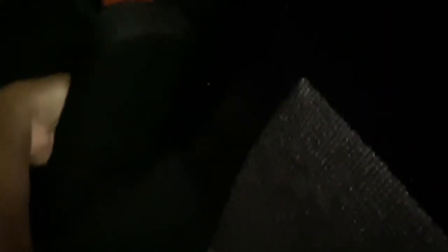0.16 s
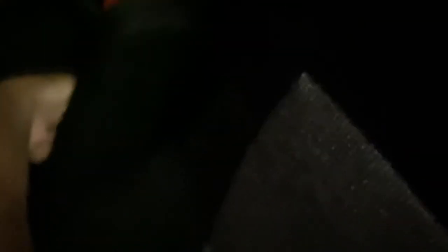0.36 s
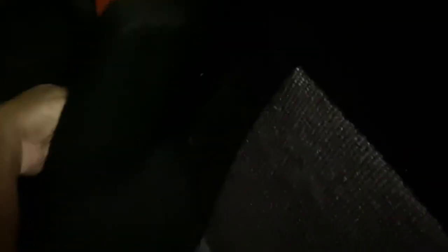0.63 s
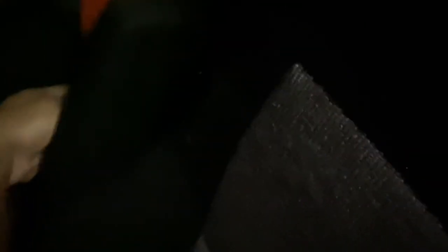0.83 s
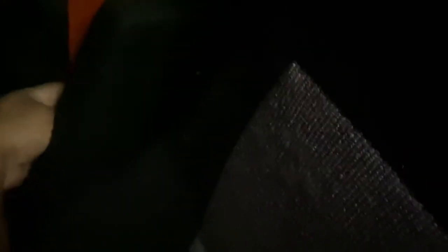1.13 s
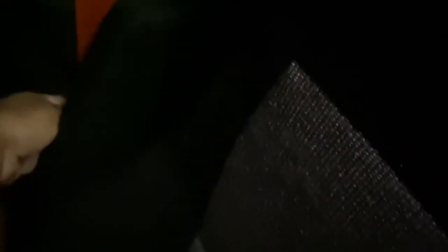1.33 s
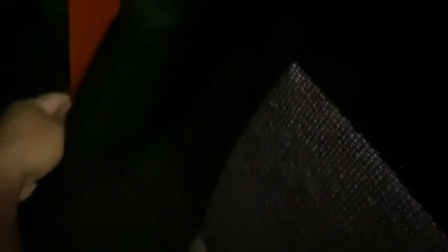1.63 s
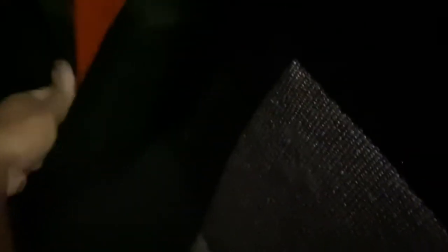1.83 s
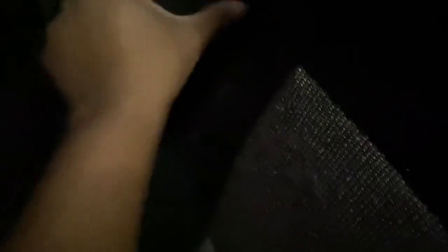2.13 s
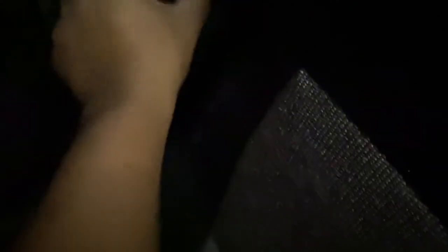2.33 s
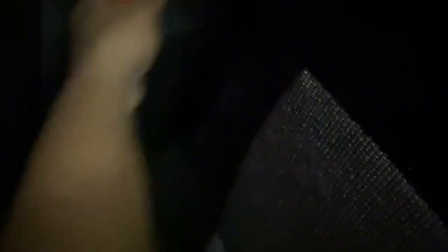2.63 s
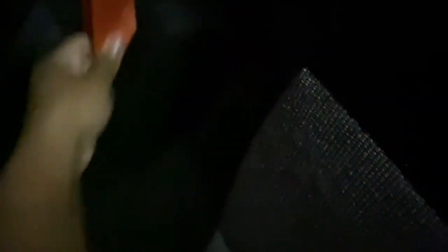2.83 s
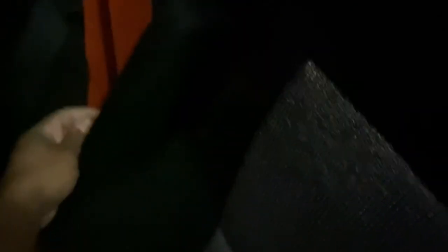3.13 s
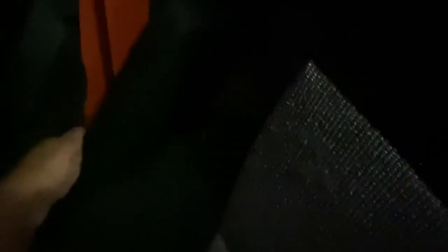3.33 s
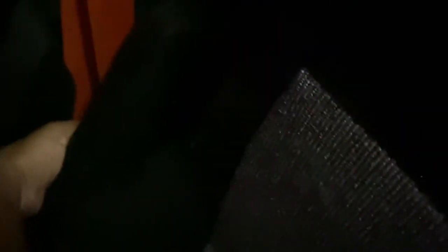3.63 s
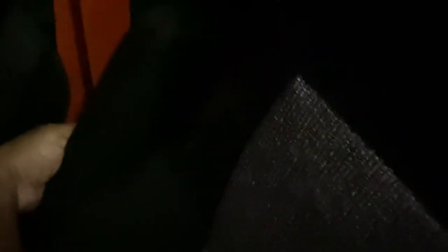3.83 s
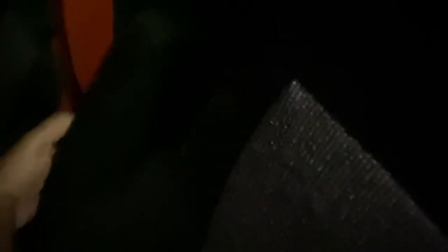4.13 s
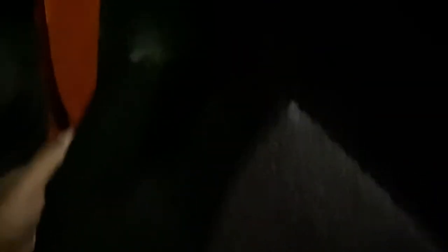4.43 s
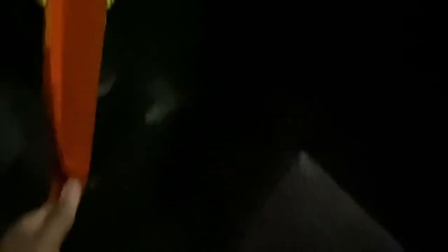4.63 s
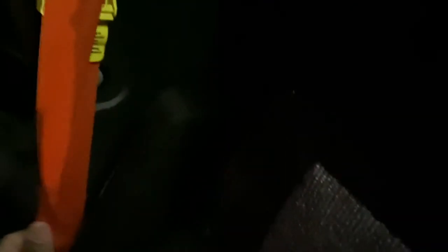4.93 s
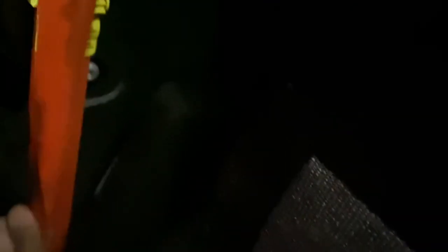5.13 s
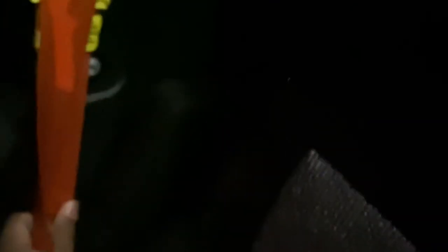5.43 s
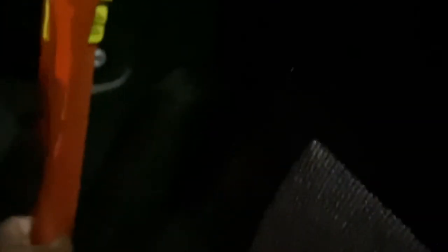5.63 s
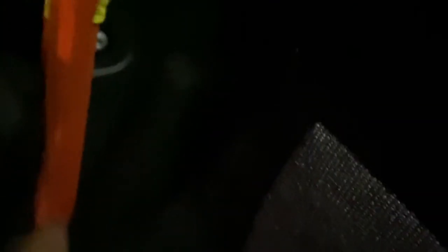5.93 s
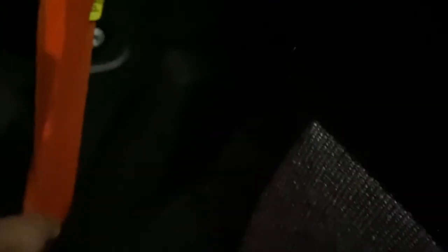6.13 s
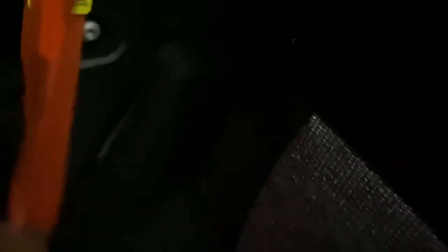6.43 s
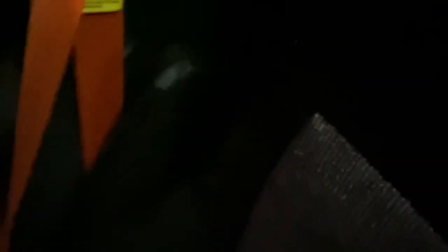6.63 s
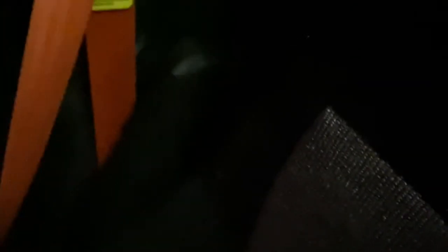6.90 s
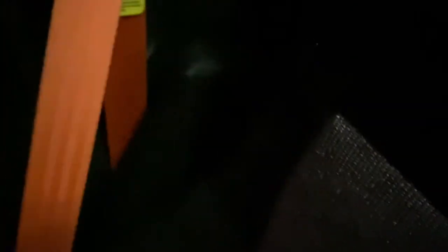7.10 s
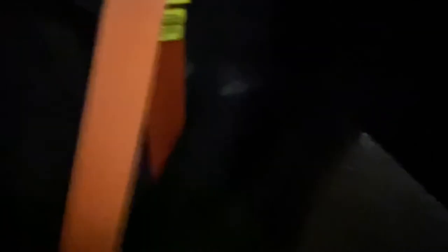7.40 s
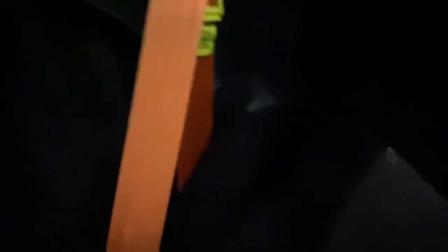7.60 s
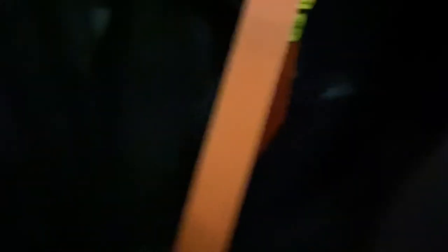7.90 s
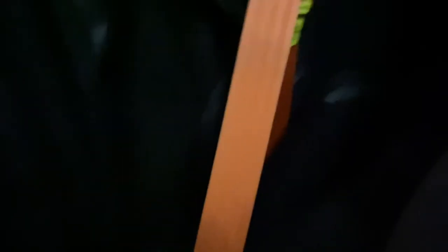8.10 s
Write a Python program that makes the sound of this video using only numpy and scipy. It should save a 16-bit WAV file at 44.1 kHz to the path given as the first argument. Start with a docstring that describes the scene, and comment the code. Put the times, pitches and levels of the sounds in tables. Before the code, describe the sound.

Inside an idling truck cab, a belt strap slides and scuffs, knocks dully on the door panel, then snaps sharply into its buckle.

```python
"""A seat belt is pulled out, wound round the door handle and latched inside an idling truck's cab.
Its webbing hisses and rasps by stick-slip friction; dragged hard, it judders on the door panel.
Buckle clicks and knocks on the door trim are short contacts that excite decaying modes.
Sines over coloured noise make the engine hum; one wandering sine makes a faint whine.
The two microphone ports are close, to the right of the belt; delays and cab scattering set them apart."""
import sys
import numpy as np
from scipy import signal
from scipy.io import wavfile
from scipy.ndimage import uniform_filter1d

SR = 44100
rng = np.random.default_rng(int(sys.argv[2]) if len(sys.argv) > 2 else 0)


def master_out(mix):
    """Clip the mix to full scale and print it as 16-bit PCM to the path in sys.argv[1]."""
    frames = np.transpose(np.atleast_2d(mix))
    ceiling = np.clip(frames, -1, 1)
    pcm = np.round(ceiling * 32767).astype(np.int16)
    wavfile.write(sys.argv[1], SR, pcm)


N = 364026  # length in samples
PORT_DELAY_MS, KNOCK_DELAY_MS = 0.46, 0.26  # lag of the right port: usual, and for sounds of the door


def amp(db):
    """Level: decibels to an amplitude ratio."""
    return 10 ** (np.asarray(db) / 20)


def evened(x):
    """Mean power: scales to rms 1."""
    return x / np.sqrt(np.mean(x ** 2) + 1e-20)


def peaked(x):
    """Short-time power: scales a stereo hit so that its loudest 5 ms have rms 1 in the port average."""
    power = uniform_filter1d(x.mean(0) ** 2, size=220)
    return x / np.sqrt(power.max() + 1e-20)


def in_band(x, band):
    """Band level: scales a stereo sound so that the port average has rms 1 within a band in Hz."""
    bandpass = signal.butter(4, band, "bandpass", fs=SR, output="sos")
    return x / signal.sosfilt(bandpass, x.mean(0)).std()


def read(points, hz):
    """Logarithmic frequency: interpolates a spectrum on a log-frequency axis."""
    f, value = np.transpose(points)
    return np.interp(np.log(hz + 1), np.log(f + 1), value)


def curves(rows):
    """Linear interpolation: each column of a table of times, sample by sample."""
    times, *columns = np.transpose(rows)
    return [np.interp(np.arange(N) / SR, times, column) for column in columns]


def add(mix, start_s, sound):
    """Superposition: mixes a stereo sound in at a given time."""
    part = mix[:, max(round(start_s * SR), 0):][:, :sound.shape[1]]
    part += sound[:, :part.shape[1]]


def colour(x, points, size=2048):
    """Minimum phase: a causal filter whose phase follows from the given spectrum."""
    log_gain = np.log(amp(read(points, abs(np.fft.fftfreq(size, 1 / SR)))))
    taps = np.fft.ifft(np.exp(np.conj(signal.hilbert(log_gain)))).real
    return signal.oaconvolve(x, taps)[:len(x)]


def drift(per_s):
    """Random fluctuation: lines between random knots, per_s of them a second, rms about 1."""
    place = np.arange(N) * per_s / SR
    knots = rng.standard_normal(N // 16)
    return np.interp(place, np.arange(len(knots)), knots) * np.sqrt(3 / 2)


def resonate(x, hz, width_hz):
    """Simple resonance: one damped pole with gain about 1 at hz."""
    radius = np.exp(-np.pi * width_hz / SR)
    pole = radius * np.exp(2j * np.pi * hz / SR)
    return 2 * signal.lfilter([1 - radius], [1, -pole], x).real


def ring(modes, t):
    """Modal decay: struck modes die away exponentially, by 60 dB in t60."""
    return sum(amp(db) * np.sin(2 * np.pi * hz * t) * np.exp(-np.log(1000) * t / t60)
               for hz, db, t60 in modes)


def flex(modes, t):
    """Modal build-up: panel modes take a little over a cycle to grow, so the high ones speak first."""
    return sum(ring([mode], t) * (1 - np.exp(-(t * mode[0] / 1.27) ** 2)) for mode in modes)


def burst(t, rise, decay):
    """Contact noise: a swarm of tiny contacts swells and dies (time constants in s)."""
    return rng.standard_normal(len(t)) * (1 - np.exp(-(t / rise) ** 2)) * np.exp(-t / decay)


# Decay of the scattered sound in the padded cab: f/Hz, t60/s
CAB_DECAY = [(100, 0.16), (400, 0.13), (1500, 0.059), (6000, 0.041), (15000, 0.01)]


def cab(x, wet_db, delay_ms=PORT_DELAY_MS, size=4096):
    """Direct and scattered sound: the right port hears the source late; the cab then scatters it briefly."""
    hz, t, z = signal.stft(rng.standard_normal((2, size)), SR, nperseg=128)
    decay = amp(-60 * t / read(CAB_DECAY, hz)[:, None])
    tail = signal.istft(z * decay, SR, nperseg=128)[1][:, :size]
    tail *= np.arange(size) > SR / 1000  # scattering starts after 1 ms
    paths = amp(wet_db) * tail / np.linalg.norm(tail[0])
    paths[0, 0] += 1
    paths[1, round(delay_ms * SR / 1000)] += 1
    return signal.fftconvolve(x[None], paths, axes=1)[:, :len(x)]


def slips(grain_db, flutter_db, patch_db, alike, delay_ms=PORT_DELAY_MS):
    """Stick-slip: threads slip in tiny clumps, folds vary the colour, and the ports hear partly the same."""
    clumps = amp(grain_db * drift(1400) + flutter_db * drift(90))
    left, other = rng.standard_normal((2, N)) * clumps
    right = alike * left + np.sqrt(1 - alike ** 2) * other
    right = np.roll(right, round(delay_ms * SR / 1000))
    z = signal.stft(np.array([left, right], np.float32), nperseg=512)[2]
    patches = uniform_filter1d(rng.standard_normal(z.shape[1:]), size=6, axis=0)  # over frequency
    patches = evened(uniform_filter1d(patches, size=10, axis=1))  # over time
    return signal.istft(z * amp(patch_db * patches), nperseg=512)[1][:, :N]


def snags(per_s, spread_db):
    """Random impulses: single threads let go at chance moments; a few snap much harder than the rest."""
    size = amp(spread_db * np.minimum(rng.exponential(size=N), 4))
    return size * rng.choice([-1, 1], N) * (rng.random(N) < per_s / SR)


def friction(x, spectrum, band):
    """Source and filter: slips are coloured by the cloth and scaled to rms 1 in their band."""
    return in_band(np.array([colour(port, spectrum) for port in x]), band)


END_DB = -11  # level half a length from the peak of a movement of skew 1


def strokes(rows, shape, skew):
    """Amplitude envelope: each movement (t/s of the peak, length/s, level/dB) is one bell; powers add."""
    t, power = np.arange(0, N, 32) / SR, 0
    for peak, length, db in rows:
        # a larger shape flattens the top; a skew above 1 swells faster than it fades
        away = (t - peak) / (length / 2) * np.where(t < peak, -skew, 1 / skew)
        power = power + amp(db + END_DB * np.minimum(abs(away), 10) ** shape) ** 2
    return np.interp(np.arange(N) / SR, t, np.sqrt(power))


# Engine hum in the cab: f/Hz, level/dB (rms)
HUM_ORDERS = [(44.9, -45.5), (48.4, -48.5), (52.4, -73), (57.4, -50.5), (69.9, -36), (90, -45), (96.6, -74)]
# Spectrum of cab rumble and air: f/Hz, relative level/dB (per Hz)
RUMBLE_SPECTRUM = [(22, -74.5), (32, -56), (43, -13.5), (60, 6), (110, 1), (160, -5), (250, -9.5),
                   (350, -16.5), (500, -24.5), (800, -42.5), (2000, -49), (5000, -64), (15000, -73)]
# Level of the rumble above its deepest part: t/s, level/dB
RUMBLE_LEVEL = [(0, -46.5), (2.2, -47), (3.1, -45), (4.5, -45), (5.0, -50), (6.9, -49), (7.7, -53),
                (8.25, -51.5)]


def engine():
    """Beats and a diffuse field: steady low orders beat over rumble shared less as the waves shorten."""
    t = np.arange(N) / SR
    hum = sum(amp(db) * np.sqrt(2) * np.sin(2 * np.pi * (hz * t + rng.random()) + 0.035 * drift(0.81))
              for hz, db in HUM_ORDERS)
    shared, apart = (colour(rng.standard_normal(N), RUMBLE_SPECTRUM) for _ in range(2))
    apart = colour(apart, [(60, -40), (130, -19), (300, -6.5), (800, 1.5)])  # f/Hz, level/dB
    rumble = in_band(np.array([shared + apart, shared - apart]), (130, 250))
    lowpass = signal.butter(2, 115, fs=SR, output="sos")
    deep = signal.sosfiltfilt(lowpass, rumble)
    return hum + amp(-52.0) * deep + amp(curves(RUMBLE_LEVEL)[0]) * (rumble - deep)


# Course of the faint whine, before its small random wander: t/s, f/Hz, level/dB
WHINE_COURSE = [(0, 263, -51.5), (.4, 286.6, -54.5), (.85, 290.7, -49), (1.25, 281.3, -53), (1.5, 293, -48),
                (1.85, 290.4, -50), (2.1, 298.3, -46.5), (2.5, 303.5, -43.5), (2.9, 319.4, -45),
                (3.55, 328.6, -46), (4.1, 294, -55.5), (4.6, 246, -51), (4.9, 252, -50.5), (5.2, 259, -51),
                (5.45, 255, -50.5), (5.9, 257.3, -58), (6.2, 255.5, -64.5), (6.65, 245.7, -48.5),
                (7.1, 230.7, -57.5), (7.45, 225, -53.5), (7.8, 218.8, -64), (8.25, 226, -53)]


def whine():
    """Frequency modulation: one thin tone climbs, then sinks while its level wavers."""
    hz, db = curves(WHINE_COURSE)
    phase = 2 * np.pi * np.cumsum(hz * (1 + 0.001735 * drift(20))) / SR
    ports = np.array([np.sin(phase), np.sin(phase - 0.6)])
    return amp(db + 0.42 * drift(8.8)) * np.sqrt(2) * ports


# Pulls that slide webbing through the hand:
# t/s of the peak, length/s, relative hiss level/dB, fizz level/dB added to that of the hiss
HAND_PULLS = [(0.013, 0.18, -62.5, -1.5), (0.197, 0.12, -65.5, -6), (0.333, 0.14, -70, -2),
              (0.534, 0.25, -68, -4), (0.797, 0.24, -59, -4), (1.025, 0.1, -70, 2),
              (1.228, 0.25, -65.5, -4), (1.505, 0.11, -60.5, -3.5), (1.777, 0.085, -65, 0),
              (1.914, 0.32, -68.5, -3.5), (2.094, 0.074, -76, 3), (2.268, 0.048, -83, 8),
              (2.46, 0.073, -70, 10.5), (2.61, 0.27, -68, 1), (2.753, 0.24, -59.5, -1.5),
              (2.89, 0.14, -62, 4.5), (3.033, 0.27, -60.5, -8.5), (3.275, 0.071, -62, 7.5),
              (3.459, 0.11, -63, -2), (3.579, 0.18, -69.5, -1.5), (3.772, 0.17, -67.5, 1.5),
              (3.936, 0.09, -67, -3.5), (4.108, 0.22, -64.5, -9.5), (4.28, 0.15, -66, -7),
              (4.365, 0.074, -61.5, -3), (4.474, 0.064, -63, -13), (4.658, 0.34, -60, -4.5),
              (4.783, 0.093, -57.5, -4.5), (4.936, 0.11, -64.5, -6), (5.071, 0.17, -59.5, -5),
              (5.23, 0.08, -60, 1.5), (5.428, 0.26, -59, -6), (5.586, 0.16, -59.5, -6.5),
              (5.734, 0.16, -61, -3.5), (5.874, 0.3, -72.5, -6.5), (6.047, 0.11, -71, -13.5),
              (6.202, 0.25, -70, -8), (6.306, 0.11, -56, -8), (6.453, 0.22, -55, -4.5),
              (6.638, 0.2, -59.5, -9), (6.769, 0.12, -55.5, -3.5), (7.027, 0.2, -56, -3.5),
              (7.193, 0.15, -64, -7), (7.303, 0.35, -70, -1), (7.437, 0.36, -73, -5),
              (7.534, 0.04, -64, -4), (7.594, 0.075, -62, -1), (7.713, 0.047, -71.5, -10),
              (7.792, 0.18, -68, -5.5), (7.956, 0.084, -76, 1), (8.13, 0.052, -74, 2.5),
              (8.21, 0.28, -74.5, -6.5)]
# Spectrum of the sliding hiss: f/Hz, relative level/dB (per Hz)
HISS_SPECTRUM = [(200, -1.5), (500, 8), (1050, 2), (1450, -1), (1900, -0.5), (2700, 0.5), (3300, -0.5),
                 (4200, -2), (4900, 0), (5700, 0), (7200, -9.5), (9000, -38), (15000, -32)]
# Fizz of a sleeve moving with each pull, nearer the right port: f/Hz, relative level/dB (per Hz)
FIZZ_SPECTRUM = [(4000, -16.5), (6500, -3), (9000, 1.5), (13000, -7), (15000, -1.5)]
# Stiff threads crackling as the belt bends: f/Hz, relative level/dB (per Hz)
RUSTLE_SPECTRUM = [(300, -3), (700, 1.5), (2000, 3), (4500, -2), (7000, -8), (10000, -29)]
PULL_SHAPE, PULL_SKEW = 1.7, 1.12
CREEP_DB, CREEP_FIZZ_DB, CREEP_WANDER_DB, CREEP_PER_S = -84, -5, 8.5, 6.8  # the belt never lies quite still
FIZZ_DELAY_MS = -0.29  # the fizz reaches the right port first


def webbing():
    """Sliding friction: each pull makes the belt crackle and hiss, and a sleeve moving with it fizz."""
    creep = amp(CREEP_DB + CREEP_WANDER_DB * drift(CREEP_PER_S))
    hiss_rows = [(s, length, db) for s, length, db, _ in HAND_PULLS]
    fizz_rows = [(s, length, db + fizz_db) for s, length, db, fizz_db in HAND_PULLS]
    sliding = np.hypot(creep, strokes(hiss_rows, PULL_SHAPE, PULL_SKEW))
    fizzing = np.hypot(creep * amp(CREEP_FIZZ_DB), strokes(fizz_rows, PULL_SHAPE, PULL_SKEW))
    hiss_band, fizz_band = (3000, 8000), (9000, 15000)  # Hz

    belt = slips(grain_db=1.5, flutter_db=1.6, patch_db=2.1, alike=0.26)
    hiss = friction(belt, HISS_SPECTRUM, hiss_band) * sliding
    sleeve = slips(grain_db=1.0, flutter_db=2.0, patch_db=2.0, alike=1.0, delay_ms=FIZZ_DELAY_MS)
    fizz = friction(sleeve, FIZZ_SPECTRUM, fizz_band) * fizzing
    rustle = cab(colour(snags(per_s=450, spread_db=3.5), RUSTLE_SPECTRUM), wet_db=-2.0)
    crackle = in_band(rustle, hiss_band) * sliding
    return amp(-1.5) * hiss + amp(-0.5) * fizz + amp(-7.5) * crackle


# Webbing rubbing on the trim:
# t/s of the peak, length/s, level/dB, centre f/Hz of the rasp, width/Hz of each of its two resonators
TRIM_RUBS = [(0.007, 0.079, -62, 1470, 600), (0.37, 0.46, -69, 1330, 448), (0.766, 0.12, -65, 1450, 900),
             (0.94, 0.11, -62, 1590, 397), (1.15, 0.35, -67, 1595, 394), (1.306, 0.17, -58, 1630, 450),
             (1.514, 0.061, -61.5, 1750, 1400), (2.783, 0.18, -78, 1600, 1200),
             (3.324, 0.068, -67, 1430, 508), (3.52, 0.5, -69, 1980, 1425), (4.092, 0.38, -61.5, 1880, 2070),
             (4.466, 0.035, -64, 1280, 1200), (4.7, 0.49, -63.5, 1545, 1200),
             (5.064, 0.18, -56, 1830, 1200), (5.23, 0.075, -64, 2063, 900), (5.293, 0.022, -53, 1390, 453),
             (5.337, 0.08, -54.5, 1440, 450), (5.498, 0.22, -59.5, 1940, 900),
             (5.736, 0.12, -66, 1854, 900), (6.046, 0.16, -66, 1933, 599), (6.289, 0.13, -65, 1510, 1197),
             (6.488, 0.15, -54.5, 1712, 1500), (6.762, 0.049, -49.5, 1870, 1500),
             (7.214, 0.13, -64.5, 1846, 1200)]
# Spectrum of the rubbing: f/Hz, relative level/dB (per Hz)
RUB_SPECTRUM = [(400, -23), (1100, -8.5), (1450, 0), (3000, -5.5), (4200, -6), (8000, -37)]
RUB_SHAPE, RUB_SKEW = 1.32, 0.94
SQUEAK, SQUEAK_HZ = (6.615, 0.08, -53), 3620  # after the latch snaps: t/s of the peak, length/s, level/dB
TAUT_WIDTH_HZ = 360  # a rasp wider than this loses its overtone, as on a slack belt


def rubs():
    """Friction-driven resonance: the belt rasps, narrow when taut and broad when slack, and squeaks once."""
    scuff = slips(grain_db=2.0, flutter_db=1.6, patch_db=1.5, alike=0.22)
    squeak = evened(resonate(scuff, SQUEAK_HZ, width_hz=67))
    out = squeak * strokes([SQUEAK], RUB_SHAPE, RUB_SKEW)
    for s, length, db, hz, width_hz in TRIM_RUBS:
        span = slice(max(round((s - 2 * length) * SR), 0), round((s + 2 * length) * SR))
        source = scuff[:, span]
        tautness = min(TAUT_WIDTH_HZ / width_hz, 1) ** 2
        overtone = amp(-2.5) * tautness * resonate(source, 1.68 * hz, width_hz=170)
        rasp = resonate(resonate(source, hz, width_hz), hz, width_hz) + overtone
        rubbing = strokes([(s, length, db)], RUB_SHAPE, RUB_SKEW)[span]
        out[:, span] += friction(rasp, RUB_SPECTRUM, (1250, 2400)) * rubbing
    return out


# Buckle and tongue clicks: t/s of full contact, level/dB, contact decay/ms, f/Hz of the struck spot,
# then relative level/dB of: the spot, bright edge, thud
BUCKLE_CLICKS = [(0.0664, -48.5, 1.4, 2380, -13, -4, 6.5), (2.712, -49, 2.2, 1750, 0, -18, -17),
                 (2.725, -53.5, 2, 4300, -6, -18, -15), (2.7939, -37.5, 1.9, 1660, 9, -26, -30),
                 (2.9275, -36.5, 0.46, 3560, 9, -13, -2), (3.0078, -39.5, 1, 4750, -1, -18, -13),
                 (3.0126, -41, 2.4, 2370, 0, -18, -5), (3.427, -58, 1.3, 2240, 0, -15, -12),
                 (3.435, -56, 1.3, 1400, -3, -6, -2), (3.893, -58, 1.28, 2406, 12, -11, -17),
                 (5.2196, -32.5, 1.21, 2100, -2, -2, -5.5), (5.253, -48, 2.7, 1910, 3, 0, 1),
                 (5.282, -50.5, 0.84, 6000, -3, -8, -15), (5.2972, -49, 0.99, 5900, -11, -5, 1),
                 (5.599, -48.5, 3.3, 5040, 1, -22, -20), (6.2293, -50.5, 1.2, 2330, 11, -25, 2),
                 (6.41, -43, 2.5, 2310, 2, -17, -10), (6.444, -50, 1.15, 2030, -3, -24, 9),
                 (6.479, -54, 1.01, 4320, 10, -20, -8), (6.485, -42, 1.6, 1670, 18, -20, -14),
                 (6.494, -54, 0.84, 4600, 6.5, -16, -1), (6.522, -41, 0.75, 4106, 10, -20, 6.5),
                 (6.53, -44, 0.88, 1040, 2, -8, 3.5), (6.5391, -33, 2.2, 3554, -34, -29, -10),
                 (6.5417, -26, 1.5, 3860, -5.5, -18, -13.5), (6.588, -52, 1.2, 1700, 9, -23, 2),
                 (6.615, -50.5, 1.2, 4860, 5, -23, -12), (6.654, -44.5, 2.3, 1970, 1, -17, -1),
                 (6.733, -56, 1.9, 2186, 7, -11, -9), (7.13, -51, 2.7, 2290, 21, -22, -17),
                 (7.142, -53, 3.2, 4700, 8, -23, -17), (7.228, -52, 4.6, 2100, 9, -16, -17),
                 (7.36, -44, 3.5, 4760, 0, -1, -22), (7.41, -55.5, 1.6, 2864, 7, -22, -21),
                 (8.118, -60.5, 1.5, 1980, -12, -1, -15)]
# Modes of the buckle, before each grip shifts them: f/Hz, relative level/dB, t60/s
BUCKLE_MODES = [(1450, -27, .03), (2050, 16, 0.035), (2480, -18, 0.02), (3430, 4, 0.027), (3930, -8, 0.035),
                (3970, -9, .03), (5400, -16, 0.029), (5800, 15, 0.025), (5800, 28, 0.03),
                (6620, -11, 0.066), (7500, -26, 0.05)]
# Spectrum of the contact: f/Hz, relative level/dB (per Hz)
CRACK_SPECTRUM = [(300, 2), (900, -11), (1500, -6), (2000, 3.5), (2800, 3), (3400, 9), (4300, 1.5),
                  (6500, 0.5), (8500, -6), (15000, -13.5)]
# Bright edge of a metal contact: f/Hz, relative level/dB (per Hz)
EDGE_SPECTRUM = [(4000, -7), (9500, 9), (13000, 8.5), (15000, 16)]
# The handle nudged by the buckle: f/Hz, relative level/dB, t60/s
HANDLE_MODES = [(307, -2.5, 0.031), (203, -10.5, 0.085), (474, -13, 0.033)]
LEAD_MS = 3  # the first touch starts this long before full contact
AHEAD_FROM_S = 6.5  # from here on the buckle is straight ahead, and reaches both ports at once
GRIP_SPREAD_DB, GRIP_DETUNE = 1.5, 0.0089  # the grip favours and shifts other modes at every click
CLICK_WET_DB = -4.5  # how much of a click comes back from the cab


def clicks():
    """Impact excitation: a soft touch, then full contact; the buckle rings briefly and nudges the door."""
    out, t = np.zeros((2, N)), np.arange(SR // 8) / SR
    lead = LEAD_MS / 1000
    after = np.maximum(t - lead, 0)
    for s, db, contact_ms, hz, spot_db, bright_db, thud_db in BUCKLE_CLICKS:
        decay = contact_ms / 1000
        touch = burst(t, rise=0.0015, decay=decay)
        contacts = amp(-1.5) * touch + burst(after, rise=0.00025, decay=decay)

        grip = rng.standard_normal((len(BUCKLE_MODES), 2))
        modes = [(f * (1 + GRIP_DETUNE * shift), level + GRIP_SPREAD_DB * favour, t60)
                 for (f, level, t60), (shift, favour) in zip(BUCKLE_MODES, grip)]
        metal = signal.fftconvolve(contacts, ring(modes, t))[:len(t)]
        clear_spot = ring([(hz, 0, 0.009), (1.34 * hz, -5, 0.008)], after)
        rough_spot = signal.fftconvolve(contacts, ring([(hz, 0, 0.003)], t))[:len(t)]
        spot = evened(clear_spot) + amp(-2.0) * evened(rough_spot)
        crack = evened(colour(contacts, CRACK_SPECTRUM)) + amp(-11.5) * evened(metal)
        crack += amp(spot_db) * evened(spot)

        delay_ms = PORT_DELAY_MS * (s < AHEAD_FROM_S)
        sound = peaked(cab(crack, wet_db=CLICK_WET_DB, delay_ms=delay_ms))
        edge = cab(colour(contacts, EDGE_SPECTRUM), wet_db=CLICK_WET_DB, delay_ms=delay_ms)
        thud = cab(flex(HANDLE_MODES, after), wet_db=-10.0, delay_ms=KNOCK_DELAY_MS)
        sound += amp(bright_db) * peaked(edge) + amp(thud_db) * peaked(thud)
        add(out, s - lead, amp(db) * sound)
    return out


BEND_FROM_HZ, BEND_TO_HZ, BEND_FALL_S, BEND_PEAK_S = 1000, 185, 0.00323, 0.0056


def bend(t):
    """Dispersion: short ripples outrun long ones, so the first bending wave drops quickly in pitch."""
    hz = BEND_TO_HZ + (BEND_FROM_HZ - BEND_TO_HZ) * np.exp(-t / BEND_FALL_S)
    age = t / BEND_PEAK_S
    return np.sin(2 * np.pi * np.cumsum(hz) / SR) * age ** 2 * np.exp(-age ** 2)


# Knocks of hand and belt on the door trim: t/s, level/dB, f/Hz of the struck spot,
# then relative level/dB of: the spot, tick, chatter, boom of the door skin, first bending wave
TRIM_KNOCKS = [(0.777, -26, 255, 7.5, -17, -3, 4.5, 8), (0.827, -38.5, 375, 14, -33, -18, 11, -16),
               (2.977, -31, 297, 7, -27, -4, 5, -30), (3.289, -44, 340, 5, -25, -24, 2, -7),
               (3.427, -39, 397, -4, -38, -4.5, -18, -15), (3.75, -45, 374, 3, -22, -3, -12, -15),
               (3.891, -38, 344, -0.5, -20, -20, -23, -15), (4.157, -34.5, 336, 6, -22, -10.5, 5, -3),
               (4.3655, -28.5, 394, 8, -13, -6.5, -4, -5), (4.371, -33.5, 750, 2, -26, -19, -26, -14),
               (4.45, -27.5, 277, -3.5, -21, -10, -17, -14), (4.462, -27, 696, -6.5, -22, -2, -15, -12),
               (4.518, -31.5, 250, 8, -41, -12, -16, -8), (4.569, -43, 638, -3, -23, 0, -15, -10),
               (4.587, -36, 239.7, 27, -34, -10, -20, -20), (4.628, -39, 234, 23, -27, -14, -15, -4),
               (4.646, -35, 247, 15, -22, -3, -12, -4), (4.6659, -33, 390, 1, -9.5, 3, 2, -11),
               (4.678, -33, 376, 15, -34, -13, -6, -10), (4.694, -32, 375, 11, -18, -4, -9, -21),
               (4.716, -37, 384, 6, -28, 0, -18, -25), (6.465, -38, 300, 23, -20, -7, -7, -12),
               (6.508, -36, 328, 6, -18, -5, -2, -8), (6.544, -34.5, 245, 21, -27, -22, 4, -12),
               (6.578, -42.5, 303.4, 6, -24, -6, -12, -5), (6.652, -36.5, 193.6, 26, -31, -6, 7, -15),
               (6.777, -30.5, 526, 20, -11.5, -4.5, 9.5, -6.5), (7.2225, -39, 610, 14, -10.5, -4, 10, -16)]
# Modes of the door trim: f/Hz, relative level/dB, t60/s
TRIM_MODES = [(189, -3, 0.1), (264, 0.5, 0.1), (378.5, 2, 0.064), (528, -5, 0.079), (657, -7, 0.033),
              (778, -11, 0.042)]
# Slow modes of the door skin: f/Hz, relative level/dB, t60/s
SKIN_MODES = [(80.7, 9, 0.11), (130.4, 0.5, 0.14)]
# Dense ring of the panel, heard as chatter: f/Hz, relative level/dB (per Hz)
PANEL_SPECTRUM = [(70, -15.5), (180, -0.5), (380, 2), (700, -4), (1000, -28.5), (2500, -46)]
# Contact noise of a knock: f/Hz, relative level/dB (per Hz)
TICK_SPECTRUM = [(500, 0), (1100, 6.5), (1600, 4.5), (3000, -6), (7000, -26), (15000, -37)]


def knocks():
    """Modal excitation: a blow bends the trim and rings it, the spot and the skin; loose trim chatters."""
    out, t = np.zeros((2, N)), np.arange(SR // 4) / SR

    def heard(x, wet_db):
        """Room response: the sound at the two ports, scaled to a common strength."""
        return peaked(cab(x, wet_db, delay_ms=KNOCK_DELAY_MS))

    slap = heard(bend(t), wet_db=-18.0)
    for s, db, hz, spot_db, tick_db, chatter_db, boom_db, bend_db in TRIM_KNOCKS:
        blow = heard(flex(TRIM_MODES + [(hz, spot_db, 0.06)], t), wet_db=-17.5)
        chatter = heard(colour(burst(t, rise=0.0015, decay=0.014), PANEL_SPECTRUM), wet_db=-11.0)
        tick = heard(colour(burst(t, rise=0.00024, decay=0.0076), TICK_SPECTRUM), wet_db=-2.5)
        boom = amp(boom_db) * flex(SKIN_MODES, t)
        body = peaked(blow + amp(chatter_db) * chatter)
        add(out, s, amp(db) * (body + amp(tick_db) * tick + boom + amp(bend_db) * slap))
    return out


# Belt dragged hard across the door panel, each drag swelling and fading about evenly:
# t/s of the peak, length/s, judder level/dB, crackle level/dB, f/Hz of the rubbed spot
PANEL_DRAGS = [(1.93, 0.16, -55, -64, 380), (4.376, 0.049, -53, -48, 380), (4.484, 0.042, -41, -51, 370),
               (4.594, 0.085, -46.5, -50, 250), (4.64, 0.06, -45, -50, 260),
               (4.702, 0.079, -36, -44.5, 380), (6.43, 0.065, -45.5, -55.5, 317),
               (6.468, 0.039, -46, -50, 312), (6.523, 0.07, -52, -44, 320),
               (6.641, 0.11, -53, -53.5, 280.8), (6.776, 0.059, -50.5, -49, 500),
               (7.009, 0.051, -76, -78, 380), (7.153, 0.12, -62, -59, 376)]
# Spectrum of the judder: f/Hz, relative level/dB (per Hz)
JUDDER_SPECTRUM = [(90, -26), (180, 3), (250, 3.5), (380, 0), (500, -4), (660, -6.5), (770, -6.5),
                   (860, -23), (1400, -7.5), (1650, -18), (4000, -49)]
# Stitches snagging: f/Hz, relative level/dB (per Hz)
GRIT_SPECTRUM = [(300, 10.5), (700, 6.5), (1100, -4), (2000, -6), (4500, -15), (9000, -31)]
DRAG_SHAPE, DRAG_SKEW = 1.9, 0.98


def drags():
    """Stick-slip under load: the tight belt judders, the rubbed spot drums, and stitches snag and crackle."""
    band = (200, 900)  # Hz
    catches = slips(grain_db=2.5, flutter_db=4.0, patch_db=1.0, alike=0.9, delay_ms=KNOCK_DELAY_MS)
    judder = friction(catches, JUDDER_SPECTRUM, band)
    stitches = colour(snags(per_s=360, spread_db=3.0), GRIT_SPECTRUM)
    grit = in_band(cab(stitches, wet_db=-4.5), band)
    out = np.zeros((2, N))
    for s, length, judder_db, crackle_db, hz in PANEL_DRAGS:
        drumming = evened(judder + amp(2.0) * resonate(judder, hz, width_hz=44))
        drag = amp(judder_db) * drumming + amp(crackle_db) * grit
        out += drag * strokes([(s, length, 0)], DRAG_SHAPE, DRAG_SKEW)
    return out


def scene():
    """Superposition: everything heard in the cab."""
    return engine() + whine() + webbing() + rubs() + clicks() + knocks() + drags()


# Colour difference of the microphone ports: f/Hz, left minus right level/dB
PORT_BALANCE = [(70, -0.63), (150, -1), (320, -4.5), (520, -1), (750, 2.5), (1800, -3), (2700, 0.5),
                (4000, 4.5), (6000, 1.5), (9500, 0.5)]
BAND_LIMIT_HZ = 15700


def record(dry):
    """Linear filtering: each microphone port has its own colour; then the band limit."""
    ports = np.array([colour(x, [(hz, side * db / 2) for hz, db in PORT_BALANCE])
                      for x, side in zip(dry, (1, -1))])
    lowpass = signal.firwin(511, BAND_LIMIT_HZ, window=("kaiser", 9), fs=SR)
    return signal.oaconvolve(ports, lowpass[None], "same")


dry = scene()
out = record(dry)
master_out(out)
```